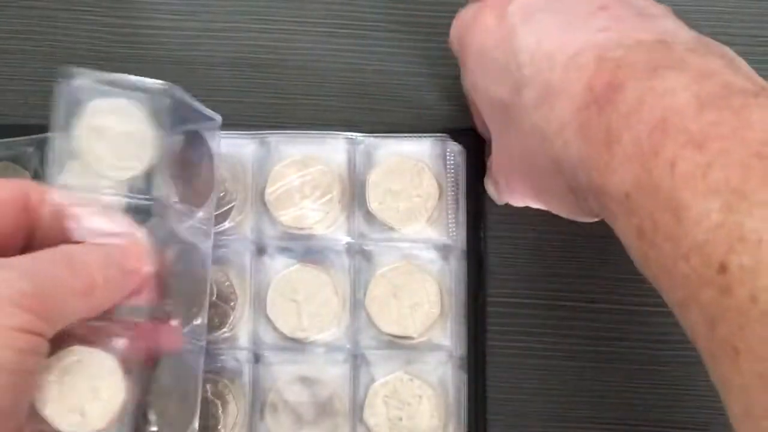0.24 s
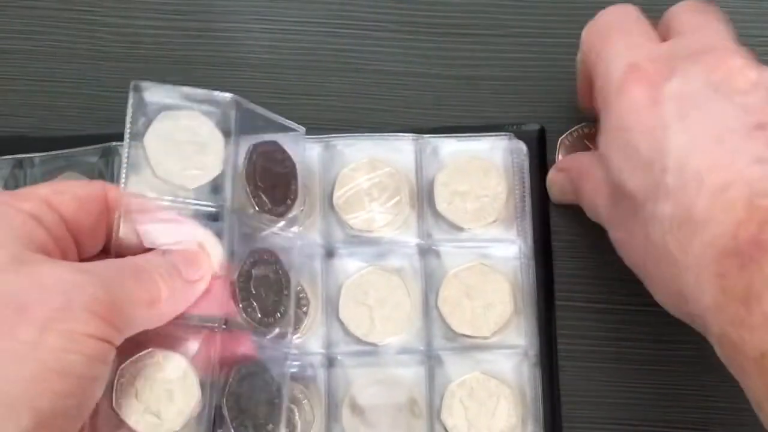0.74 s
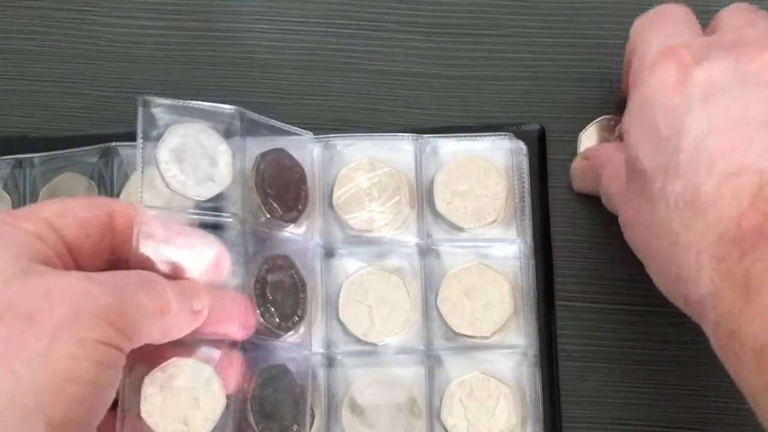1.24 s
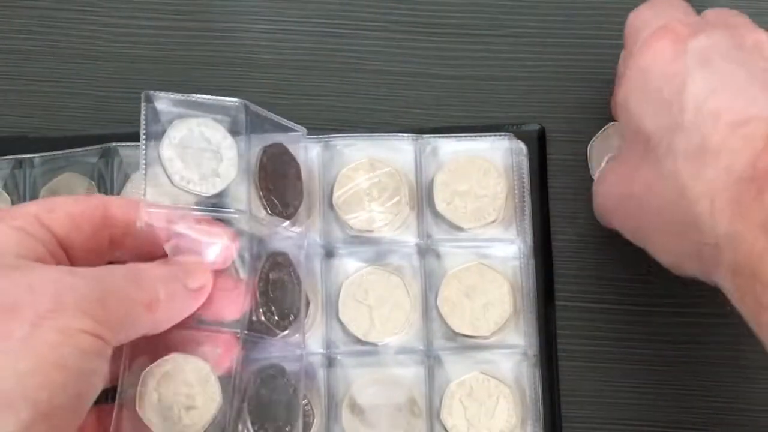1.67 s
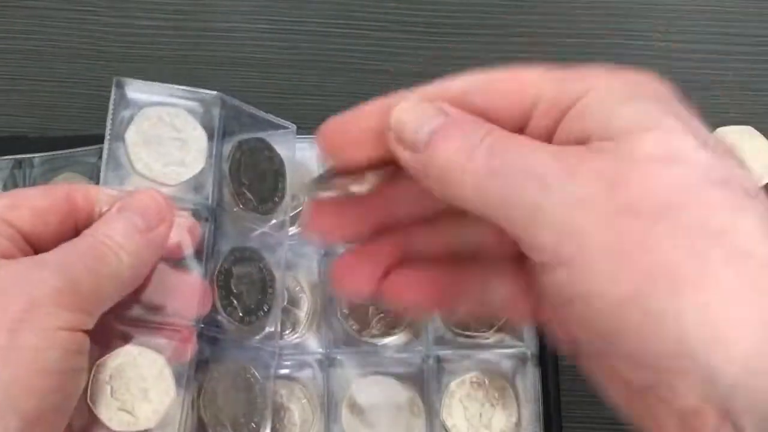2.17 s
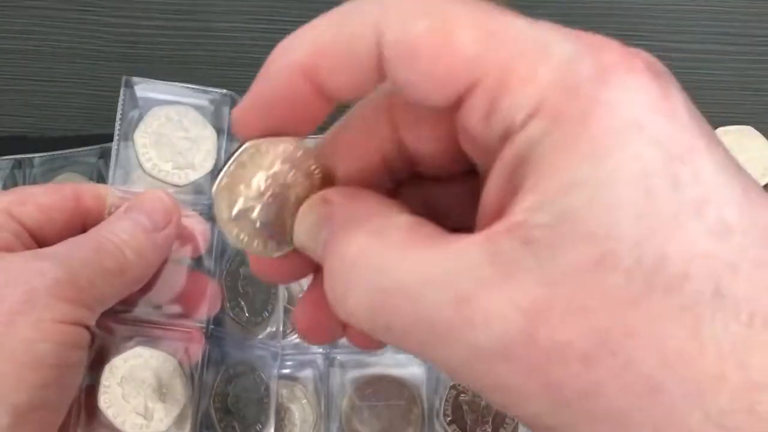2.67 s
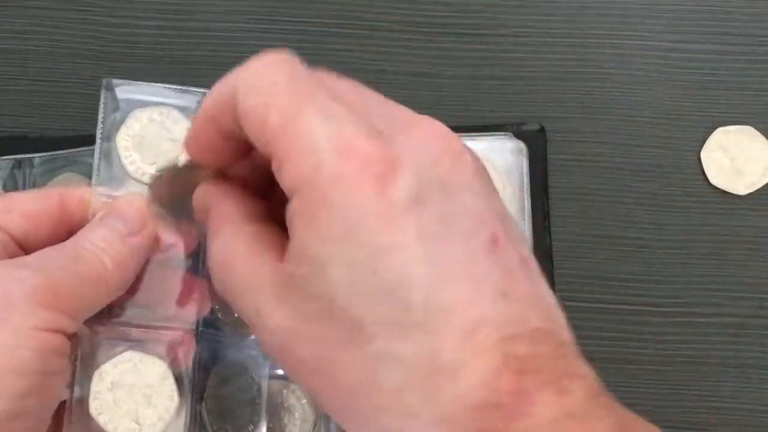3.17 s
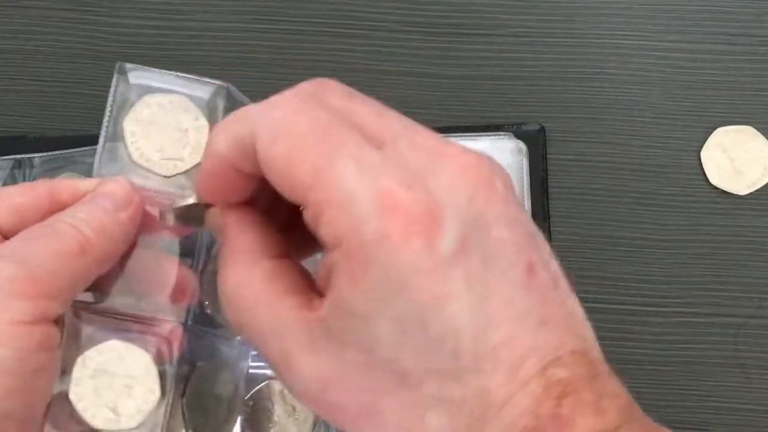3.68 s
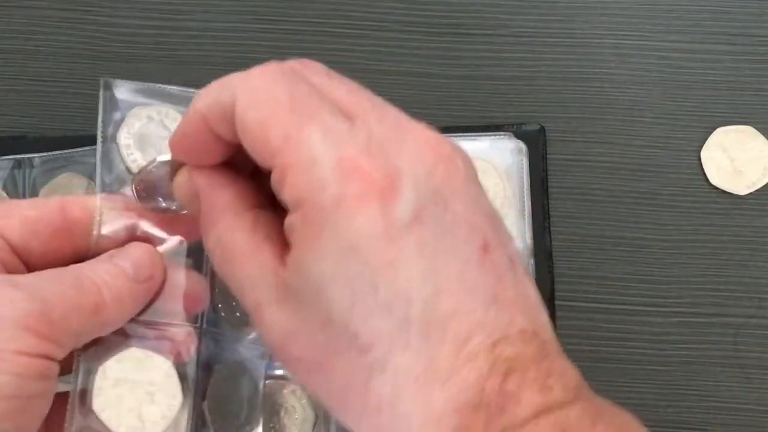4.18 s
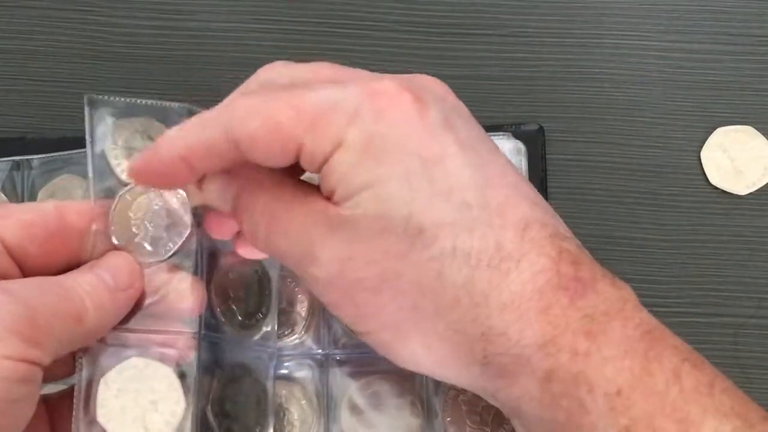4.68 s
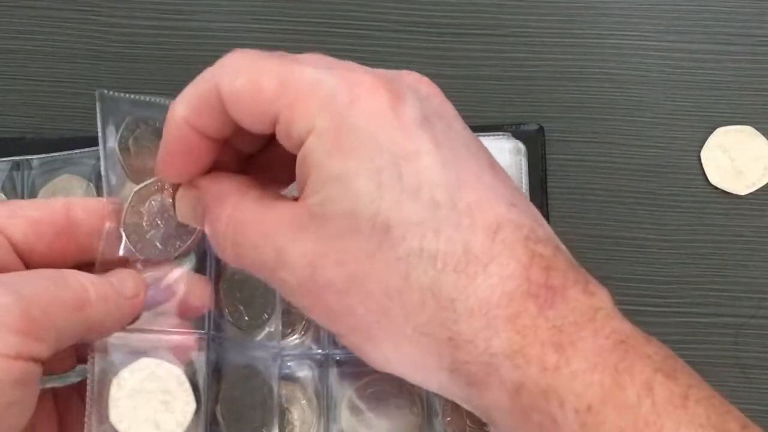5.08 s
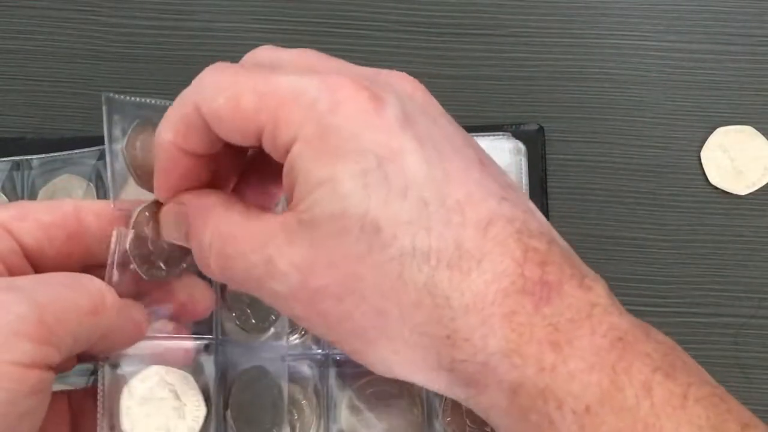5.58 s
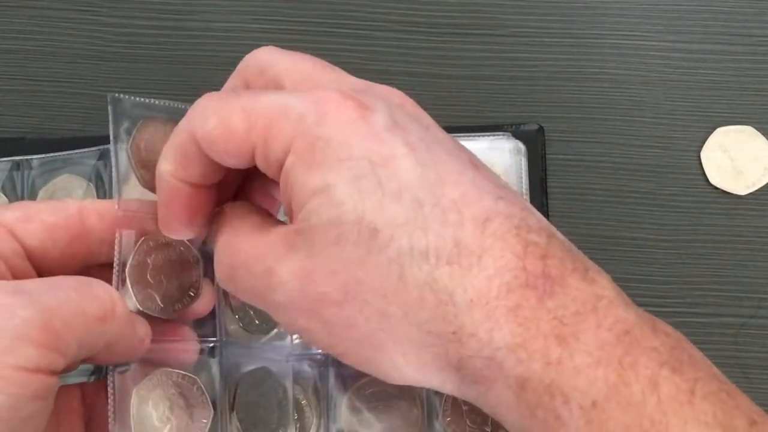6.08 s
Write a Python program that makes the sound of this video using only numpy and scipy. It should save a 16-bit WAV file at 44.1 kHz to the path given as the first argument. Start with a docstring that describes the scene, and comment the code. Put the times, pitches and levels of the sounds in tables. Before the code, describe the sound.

Short gritty coin scrapes and woody clacks on a tabletop give way to quiet plastic crinkling with a few crisp, bright clicks.

```python
"""A coin scrapes over a wooden table and knocks on it, then is pushed into a plastic pocket of an album page.
Scrapes are random tiny slips ringing the table top; knocks, bumps and film snaps are shaped noise bursts.
Rubbing and crinkling of the stiff film are coloured grains that swell and fade with each hand movement.
Short room tails surround them, over rumble, hiss and a faint low hum that wavers, then settles."""
import sys
import numpy as np
from scipy import signal
from scipy.fft import rfft, irfft, next_fast_len
from scipy.io import wavfile
from scipy.ndimage import uniform_filter1d, map_coordinates

SR = 44100
rng = np.random.default_rng(int(sys.argv[2]) if len(sys.argv) > 2 else 0)


def persist_wave(psi):
    """Save psi, clipped to +-1, as 16-bit WAV."""
    counts = np.round(np.clip(psi, -1, 1) * 32767).astype(np.int16)
    wavfile.write(sys.argv[1], SR, np.atleast_2d(counts).T)


N = 279084  # length in samples
HIT = 4096  # samples set aside for one hit
RAMP_DB = 24  # a stroke is this far down one attack before, and one release after, its hold


def amp(db):
    """Decibels to gain."""
    return 10 ** (np.asarray(db) / 20)


def unit(x):
    """Scale to rms 1."""
    return x / np.sqrt(np.mean(x ** 2) + 1e-20)


def along(points, hz):
    """Read (Hz, value) points at any frequency, on a log axis."""
    f, v = np.transpose(points)
    return np.interp(np.log(hz + 1), np.log(f + 1), v)


def curves(rows):
    """One value per sample for each column after the time."""
    s, *cols = np.transpose(rows)
    return [np.interp(np.arange(N) / SR, s, c) for c in cols]


def wobble(rate):
    """A smooth random curve with rate knots a second."""
    knots = rng.standard_normal(int(N * rate / SR) + 4)
    return map_coordinates(knots, [np.arange(N) * rate / SR])


def filtered(x, gain):
    """Pass x through a causal (minimum phase) filter with the given gain of frequency."""
    m = 2 * next_fast_len(len(x))
    cepstrum = irfft(np.log(np.maximum(gain(np.fft.rfftfreq(m, 1 / SR)), 1e-6)))
    # fold the cepstrum onto positive time, so nothing sounds before its cause
    cepstrum[1:m // 2] *= 2
    cepstrum[m // 2 + 1:] = 0
    return irfft(rfft(x, m) * np.exp(rfft(cepstrum)))[:len(x)]


def coloured(x, spectrum):
    """Give x a spectrum, at rms 1."""
    return unit(filtered(x, lambda hz: amp(along(spectrum, hz))))


def below(hz, edge_hz):
    """Smooth step from 1 under the edge to 0 above it."""
    return 1 / (1 + (hz / edge_hz) ** 4)


def resonant(hz, modes, between_db):
    """Gain of a body whose resonances stand over an even base."""
    power = amp(between_db) ** 2
    for mode_hz, width_hz, db in modes:
        power = power + amp(db) ** 2 / (1 + (2 * (hz - mode_hz) / width_hz) ** 2)
    return np.sqrt(power)


def grains(rate, spread_db):
    """Random tiny slips of uneven size, rate a second on average, at rms 1."""
    slips = (rng.random(N) < rate / SR) * rng.choice([-1, 1], N)
    sizes_db = spread_db * np.minimum(rng.standard_normal(N), 2)
    return unit(slips * amp(sizes_db))


def stroke(s, hold, db, attack, release):
    """Gain of one hand movement: it swells, holds and dies away."""
    t = np.arange(N) / SR - s
    outside = np.maximum(-t, 0) / attack + np.maximum(t - hold, 0) / release
    return amp(db - np.minimum(RAMP_DB * outside, 200))


def rocking(x, depth_db):
    """As the point of contact moves, now one resonance and now another stands out."""
    z = signal.stft(x, nperseg=512)[2]
    field = uniform_filter1d(rng.standard_normal(z.shape), size=3, axis=0)  # smooth over pitch
    field = uniform_filter1d(field, size=7, axis=1)  # smooth over time
    return signal.istft(z * amp(depth_db * unit(field)), nperseg=512)[1][:N]


def burst(rise, decay, crack):
    """A flurry of contacts that builds up to one sharp crack and dies away; times in s."""
    t = (np.arange(HIT) - HIT // 2) / SR
    flurry = rng.standard_normal(HIT) * np.exp(-np.abs(t) / np.where(t < 0, rise, decay))
    return flurry / np.linalg.norm(flurry) + crack * (t == 0)


def sized(hit, db):
    """A hit whose energy, packed in 4 ms, has the level db."""
    return amp(db) * hit / np.linalg.norm(hit) * np.sqrt(.004 * SR)


def add(track, s, hit):
    """Mix in a hit whose middle falls at time s."""
    at = round(s * SR) - HIT // 2 + np.arange(HIT)
    inside = (at >= 0) & (at < N)
    track[at[inside]] += hit[inside]


# Pushes of the coin over the table. Each row: start in seconds, hold in seconds, scrape level in dB,
# attack in seconds, release in seconds, extra bite of the rim in dB.
COIN_PUSHES = [(0.0, 0.014, -38, .02, 0.036, -5), (.155, .025, -53, .14, 0.032, 1.5),
               (0.288, 0.048, -51.5, 0.074, 0.051, 0.5), (0.436, 0.041, -40.5, 0.099, 0.19, -1.5),
               (0.532, 0.05, -42, 0.13, .06, 1.5), (0.715, 0.029, -42, 0.064, 0.029, 0),
               (0.762, 0.022, -41.5, 0.025, 0.048, 3), (0.857, 0.13, -48, 0.0167, .055, -5),
               (1.178, 0.012, -38, 0.041, 0.052, -1), (1.217, .025, -43.5, 0.0337, 0.17, -3.5),
               (1.416, 0.025, -42, 0.072, 0.035, -1.5), (1.517, .01, -70.5, .04, 0.25, -0.5),
               (1.659, 0.063, -67.5, 0.013, 0.0268, 2)]
# Resonances of the table top. Each row: pitch in Hz, width in Hz, strength in dB.
TABLE_TOP_MODES = [(188.7, 60, -5.5), (420, 190, 1.5), (533, 80, -0.5), (780, 60, -8.5), (950, 75, -8),
                   (1383, 130, 3.5), (1530, 73, -5.5), (1730, 34, -2), (1926, 86, -0.5), (2030, 55, -3.5),
                   (2600, 160, -5.5), (2900, 138.6, -1), (3498.5, 220, 0), (3802, 50, -9), (4240, 200, -5),
                   (4730, 393.3, -5.5), (5450, 300, -10), (5930, 250, -8.5), (6400, 350, -3)]
# Tone of the scrape before the table top colours it. Each row: frequency in Hz, relative level in dB.
SCRAPE_SPECTRUM = [(59, -52), (100, -26), (193, -7.5), (308, -10.5), (415, -3.5), (721, -9.5), (1360, -8),
                   (2270, -8), (3540, -13), (4870, -21), (7770, -29), (9020, -23.5), (10500, -34),
                   (14700, -31.5), (16000, -38)]
# Tone of the finest slips, also of film crinkles and ticks. Each row: frequency in Hz, relative level in dB.
FINE_GRAIN_SPECTRUM = [(1500, -7.5), (3300, -1), (6000, -4), (9000, -1), (12000, 1), (14600, 3),
                       (16000, -10)]
# a firm push, the drone of the top under it, drone dB per scrape dB
FIRM_DB, FIRM_DRONE_DB, DRONE_GROWS = -38.5, -44, .55
CATCH_DB = -10  # now and then the rim catches on a ridge of the grain: level of these sparser slips


def sliding():
    """The coin's rim catches on the wood grain: slips ring the top, and sound brighter when the rim bites."""
    push = sum(stroke(*row) for *row, bite_db in COIN_PUSHES)
    rim = sum(amp(bite_db) * stroke(*row) for *row, bite_db in COIN_PUSHES)

    slips = grains(rate=1800, spread_db=1.5) + amp(CATCH_DB) * grains(rate=90, spread_db=1.5)
    slips = slips * amp(2.2 * wobble(70))

    def top_gain(hz):
        return amp(along(SCRAPE_SPECTRUM, hz)) * resonant(hz, TABLE_TOP_MODES, between_db=-7.5)

    def low(hz):
        return below(hz, edge_hz=770)

    def bright(hz):
        return 1 - below(hz, edge_hz=1900)

    def middle(hz):
        return (1 - low(hz)) * (1 - bright(hz))

    ring = rocking(filtered(slips, top_gain), depth_db=3.0)
    drone_gain = amp(FIRM_DRONE_DB) * (push / amp(FIRM_DB)) ** DRONE_GROWS
    drone = drone_gain * unit(filtered(ring, low))
    scrape = push * unit(filtered(ring, middle))
    bite = rim * unit(filtered(ring, bright))
    # the finest slips grow more slowly with pressure
    fizz = amp(-36.5) * rim ** .8 * coloured(grains(rate=3000, spread_db=4), FINE_GRAIN_SPECTRUM)
    return drone + scrape + bite + fizz


# Coin knocking on the table. Each row: time in seconds, level in dB, thud in dB, treble in dB,
# clink of the rim in dB, resonance favoured at that spot in Hz, rise in seconds.
COIN_KNOCKS = [(.232, -39.5, 12, 9.5, 29, 420, 0.0033), (0.2395, -12.5, 1.5, 6.5, 10.5, 4570, 0.00057),
               (0.256, -28.5, -2, 2.5, 16, 420, 0.001), (0.633, -26, 4, -0.5, 6, 420, 0.001),
               (0.6386, -25.5, -5, -4, 10, 3150, 0.0023), (.803, -46, 4, -3, 9, 400, 0.0035),
               (.843, -38, -19, -5.5, -11, 1900, 0.0017), (1.0666, -23.5, 7, 1.5, 4.5, 3140, 0.0013),
               (1.411, -35, 15, -7, 2, 420, 0.0032), (1.7791, -24, -14, -8, 9.5, 1400, 0.0043),
               (1.783, -25, -7.5, -13.5, 15, 520, 0.00088)]
# Tone common to all knocks. Each row: frequency in Hz, relative level in dB.
KNOCK_SPECTRUM = [(100, -30), (200, -17.5), (310, -8.5), (460, 0), (750, -7.5), (1400, -2), (2000, -4),
                  (3000, -1), (5000, -7.5), (6600, -8.5), (8300, -18.5), (11500, -17.5), (16000, -25.5)]
SPOT_DB, SPOT_WIDTH = 9, 0.15  # how much that resonance stands out, its half width as a share of its pitch


def knocks():
    """A coin held by fingers chatters briefly on the wood and cannot ring itself."""
    out = np.zeros(N)
    for s, db, thud_db, treble_db, clink_db, spot_hz, rise in COIN_KNOCKS:
        def gain(hz):
            tone_db = along(KNOCK_SPECTRUM, hz)
            tone_db = tone_db + thud_db * below(hz, edge_hz=750)
            tone_db = tone_db + treble_db * (1 - below(hz, edge_hz=1900))
            tone_db = tone_db + clink_db * (1 - below(hz, edge_hz=7500))
            tone_db = tone_db + SPOT_DB / (1 + ((hz / spot_hz - 1) / SPOT_WIDTH) ** 2)
            return amp(tone_db) * resonant(hz, TABLE_TOP_MODES, between_db=-11)

        chatter = burst(rise, decay=0.003, crack=0.28)
        add(out, s, sized(filtered(chatter, gain), db))
    return out


# Film snapping, or tapped by the coin. Each row: time in seconds, level in dB, body in dB,
# pitch of the fold in Hz, its ring in dB, rise in seconds.
FILM_SNAPS = [(.034, -43, -27, 14000, -6.5, 0.0057), (0.341, -42, -11, 9160, 10, .0014),
              (.811, -49.5, -1, 8900, 16, .0005), (.629, -38, 22, 5500, -14, 0.00017),
              (1.062, -39.5, -2.5, 9050, 12, .0002), (1.84, -48.5, -14, 14500, 11, .0005),
              (1.862, -45.5, -19, 1500, 23, 0.00044), (2.466, -54, 0.5, 14550, 13, 0.001),
              (2.783, -62, -15, 9000, -3, 0.00043), (3.187, -42.5, -7, 9300, 0, .0008),
              (3.236, -39, -36, 8540, 11, .003), (3.27, -28.5, -15, 13100, -3.5, 0.0013),
              (3.274, -36, 8, 1004, 8, .001), (3.512, -53.5, -12, 13200, -4, 0.00025),
              (3.540, -52.5, -3, 12650, 3, 0.00057), (3.602, -46, 1.5, 8300, 6.5, 0.00047),
              (3.744, -54, 8, 6960, 7, 0.00033), (3.824, -48, 1, 8200, 7, .0008),
              (3.861, -40.5, 2, 3976, 7, .0034), (4.192, -62, -4, 7010, 5.5, .0003),
              (4.362, -57.5, -5.5, 12400, 0.5, .0003), (4.408, -15, -18, 4400, 3, 0.000178),
              (4.41, -34.5, -12, 1496, 17.5, 0.00038), (4.733, -56.5, -6, 7570, 9, 0.00037),
              (5.051, -60, -19, 5300, 3.5, .0004), (5.252, -46, -14, 9800, 12, .001),
              (5.2642, -35.5, -21, 5200, 21, 0.00025), (5.265, -24, -9.5, 11600, 14, 0.00029),
              (5.266, -33.5, 0.5, 3090, 13, .0005), (5.342, -48, -22, 13300, 10, .0015),
              (5.349, -44, -7, 11800, 9, 0.00038), (5.399, -51.5, -29, 15400, 6, .0002),
              (5.755, -57, 4, 1294, 20, .0005), (5.86, -53.5, 35, 2600, -1.5, .0005),
              (6.154, -55.5, 12, 1500, 22, 0.00027)]
# Tone common to all snaps. Each row: frequency in Hz, relative level in dB.
FILM_SPECTRUM = [(150, -6.5), (300, 2), (600, -7), (1000, 3), (2700, -0.5), (3600, 0.5), (4700, 0),
                 (7500, -3), (10000, -3), (15000, -3), (16000, -8.5)]
# Resonances of the film pocket. Each row: pitch in Hz, width in Hz, strength in dB.
POCKET_MODES = [(2850, 400, -1), (4365, 180, 1), (5760, 830, -3.5), (7030, 350, -2.5), (7830, 290, -3.5),
                (9168, 310, -2), (9800, 400, -3.5), (12400, 1400, 0.5), (15400, 670, 4)]
FOLD_WIDTH_HZ = 950  # how widely a fold rings to either side


def snaps():
    """The film buckles: a crack, then a few milliseconds of flutter at the pitch of that fold."""
    out = np.zeros(N)
    for s, db, body_db, ring_hz, ring_db, rise in FILM_SNAPS:
        def gain(hz):
            fold_db = ring_db / (1 + ((hz - ring_hz) / FOLD_WIDTH_HZ) ** 2)
            tone_db = along(FILM_SPECTRUM, hz) + body_db * below(hz, edge_hz=4200) + fold_db
            return amp(tone_db) * resonant(hz, POCKET_MODES, between_db=-7)

        flutter = burst(rise, decay=.0024, crack=.5)
        add(out, s, sized(filtered(flutter, gain), db))
    return out


# The coin's rim dragging in the pocket. Each row: start in seconds, hold in seconds, level in dB.
RIM_DRAGS = [(3.167, .012, -59), (3.242, 0.012, -68.5), (3.585, 0.0125, -68), (3.757, 0.0091, -61.5),
             (3.797, 0.0144, -56.5), (4.366, 0.011, -64.5), (5.516, .025, -65.5), (6.071, 0.046, -60.5),
             (6.16, 0.021, -57), (6.223, .11, -71)]
# Fingers brushing over the film. Each row: start in seconds, hold in seconds, level in dB.
FINGER_BRUSHES = [(1.88, 0.11, -65), (2.043, .015, -62.5), (2.097, 0.017, -59.5), (2.225, .008, -65.5),
                  (3.237, 0.03, -54), (3.413, .008, -64.5), (3.585, 0.008, -61.5), (3.952, 0.018, -67.5),
                  (4.375, .015, -63), (4.551, 0.015, -67.5), (5.168, .03, -67), (5.53, .015, -64.5),
                  (6.034, .02, -62)]
# The page shifts in the hand. One row: start in seconds, hold in seconds, level in dB,
# attack in seconds, release in seconds.
PAGE_SHIFT_STROKE = (6.5, 1.5, -59, 0.5, .1)
# Tone of the dull rub. Each row: frequency in Hz, relative level in dB.
RUB_SPECTRUM = [(300, -23), (700, -10), (1150, -0.5), (1450, 10.5), (1850, -5), (2200, 0.5), (2800, -6.5),
                (4200, -9.5), (8000, -20)]
# Tone of the shifting page. Each row: frequency in Hz, relative level in dB.
PAGE_SPECTRUM = [(53, -38), (90, -16), (146, -13), (200, -4.5), (400, -11), (707, -22.5), (900, -19.5),
                 (1170, -39.5), (1980, -120)]
DRAG_ATTACK_S, DRAG_RELEASE_S = .014, 0.062
BRUSH_ATTACK_S, BRUSH_RELEASE_S = .06, 0.049
CRINKLE_DB, TICKS_DB = -79, -81.5  # faint crinkle (before its wavering) and ticks of the held film


def rubbing():
    """Skin and coin drag over the film: a dull jerky rub, fine crinkling, and the page shifting."""
    drag = sum(stroke(*row, DRAG_ATTACK_S, DRAG_RELEASE_S) for row in RIM_DRAGS)
    brush = sum(stroke(*row, BRUSH_ATTACK_S, BRUSH_RELEASE_S) for row in FINGER_BRUSHES)
    held = stroke(s=3.34, hold=3.0, db=0, attack=.3, release=.3)  # the pocket is held open

    jerks = grains(rate=600, spread_db=4) * amp(3.0 * wobble(45))
    rub = drag * coloured(jerks, RUB_SPECTRUM)

    crinkle_gain = brush + held * amp(CRINKLE_DB + 2.5 * wobble(7))
    crackles = grains(rate=1800, spread_db=1.5) * amp(1.3 * wobble(34))
    crinkle = crinkle_gain * coloured(crackles, FINE_GRAIN_SPECTRUM)

    # creases of the held film let go now and then
    ticks = held * amp(TICKS_DB) * coloured(grains(rate=12, spread_db=7.0), FINE_GRAIN_SPECTRUM)
    page = stroke(*PAGE_SHIFT_STROKE) * coloured(grains(rate=650, spread_db=2.5), PAGE_SPECTRUM)
    return rub + crinkle + ticks + page


# Soft bumps of the album on the table. Each row: time in seconds, level in dB, lower edge in Hz,
# upper edge in Hz.
ALBUM_BUMPS = [(0.243, -30, 185, 279), (0.633, -36.5, 174, 290), (1.068, -34, 179.8, 290),
               (3.273, -42, 70, 341.7), (3.863, -50, 230, 320), (5.865, -43, 45, 172)]


def bumps():
    """The heavy album gives a dull, quickly damped thud."""
    out = np.zeros(N)
    for s, db, low_hz, high_hz in ALBUM_BUMPS:
        def dull(hz):
            return below(hz, edge_hz=high_hz) * (1 - below(hz, edge_hz=low_hz))

        thud = burst(rise=.0005, decay=.005, crack=0.23)
        add(out, s, sized(filtered(thud, dull), db))
    return out


# How long the room rings. Each row: frequency in Hz, time to fall by 60 dB in seconds.
ROOM_DECAY = [(150, .22), (500, 0.18), (1500, 0.19), (4000, 0.18), (9000, 0.16), (15000, 0.11)]


def room(x, wet_db, wall_db, wall_delay):
    """A small room: a short diffuse tail, and one distinct wall reflection after wall_delay seconds."""
    hz, t, z = signal.stft(rng.standard_normal(SR // 2), SR, nperseg=256)
    fade = amp(-60 * t / along(ROOM_DECAY, hz)[:, None])
    tail = signal.istft(z * fade, SR, nperseg=256)[1]
    tail *= 1 - np.exp(-np.arange(len(tail)) / SR / 0.00092)  # the tail swells in over about 1 ms
    tail *= amp(wet_db) / np.linalg.norm(tail)
    tail[round(wall_delay * SR)] += amp(wall_db)
    return x + signal.fftconvolve(x, tail)[:N]


# Path of the faint hum. Each row: time in seconds, pitch in Hz, level in dB.
HUM_PATH = [(2.0, 274, -88.5), (2.25, 252, -71), (2.52, 211, -69), (2.75, 195, -83), (3.6, 258, -83),
            (3.85, 279, -73.5), (4.05, 213, -67.5), (4.28, 221, -65), (4.42, 191, -69), (5.74, 191, -67.5),
            (5.85, 191, -74)]
# Tone of the rumble and hiss. Each row: frequency in Hz, relative level in dB.
FLOOR_SPECTRUM = [(15, -35.5), (28, -10.5), (45, 1), (90, -4.5), (142, -3.5), (204, -7.5), (472, -18.5),
                  (759, -21.5), (1480, -23.5), (3160, -27), (4940, -28.5), (10500, -27.5), (14700, -23.5),
                  (16000, -24.5)]


def background():
    """Room rumble and microphone hiss are coloured noise; the faint hum is a sine of wandering pitch."""
    hum_hz, hum_db = curves(HUM_PATH)
    final_hz = HUM_PATH[-1][1]
    unsteady_hz = np.clip(np.abs(hum_hz - final_hz), 0, 14)  # the hum is fuzzy until its pitch settles
    phase = 2 * np.pi * np.cumsum(hum_hz + unsteady_hz * wobble(45)) / SR
    hum = amp(hum_db) * unit(np.sin(phase))
    floor = amp(-64.5) * coloured(rng.standard_normal(N), FLOOR_SPECTRUM)
    return hum + floor


def scene():
    """The table is a little farther from the microphone than the pocket, so it gets more room."""
    table = room(sliding() + knocks() + bumps(), wet_db=-10.5, wall_db=-19.5, wall_delay=.02)
    pocket = room(snaps() + rubbing(), wet_db=-11.5, wall_db=-23.5, wall_delay=0.015)
    return (table + pocket + background())[None]


TOP_HZ = 15950  # middle of the 300 Hz wide slope at the band limit


def record(dry):
    """The recorder keeps nothing above its band limit."""
    m = next_fast_len(N + SR // 2)
    hz = np.fft.rfftfreq(m, 1 / SR)
    keep = np.clip((TOP_HZ - hz) / 300 + .5, 0, 1)
    return irfft(rfft(dry, m) * keep, m)[:, :N]


dry = scene()
out = record(dry)
persist_wave(out)
```